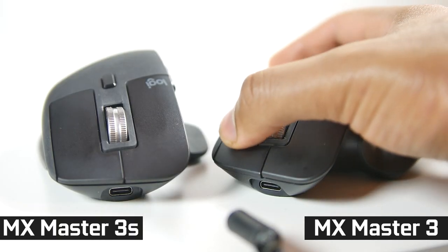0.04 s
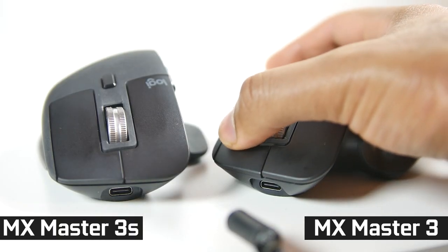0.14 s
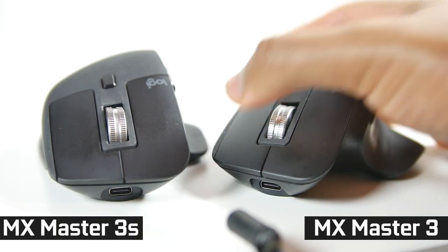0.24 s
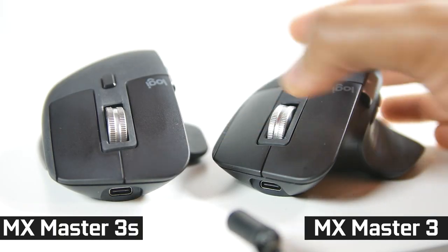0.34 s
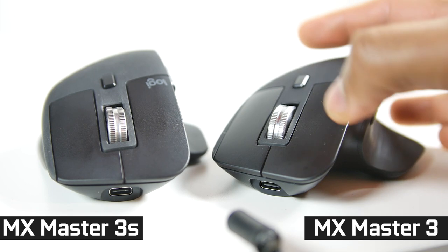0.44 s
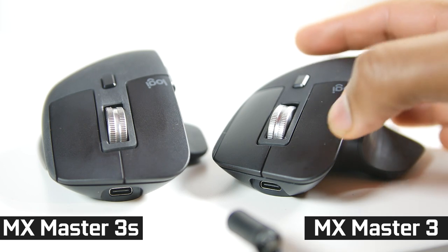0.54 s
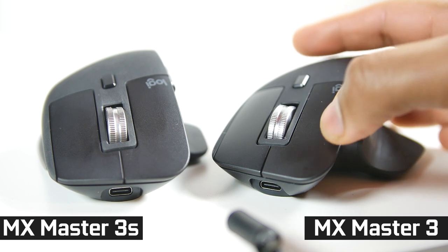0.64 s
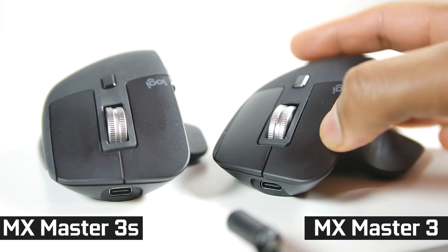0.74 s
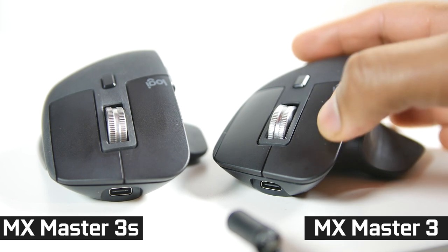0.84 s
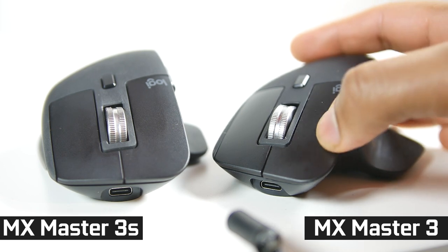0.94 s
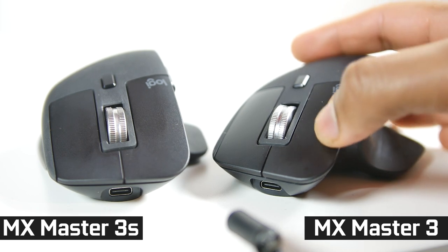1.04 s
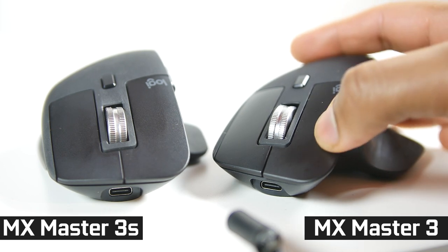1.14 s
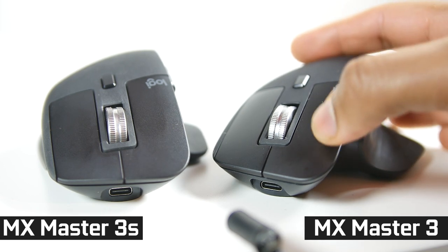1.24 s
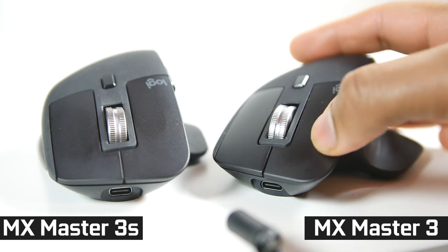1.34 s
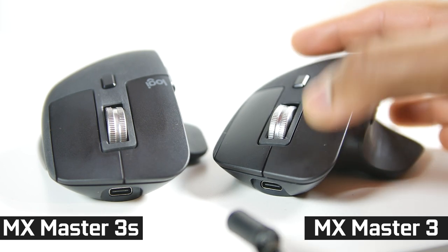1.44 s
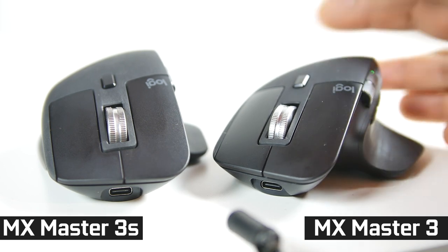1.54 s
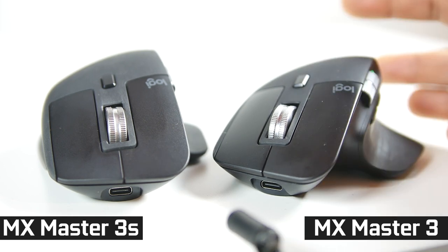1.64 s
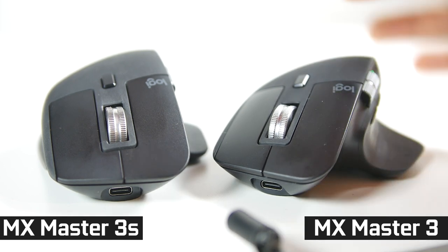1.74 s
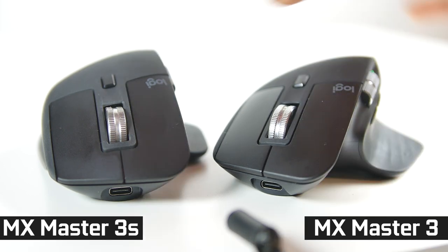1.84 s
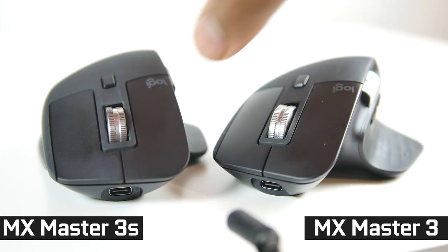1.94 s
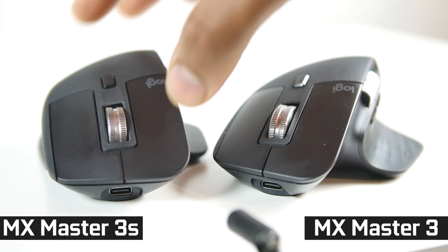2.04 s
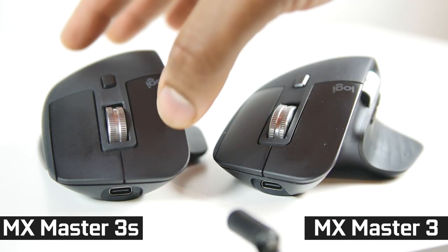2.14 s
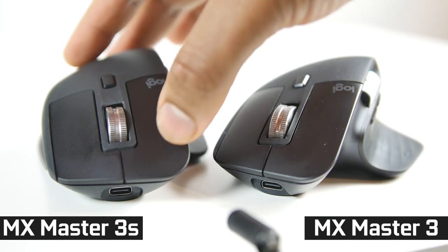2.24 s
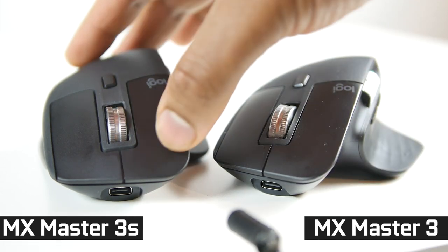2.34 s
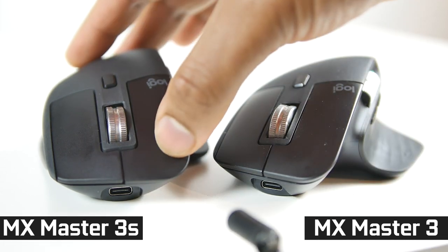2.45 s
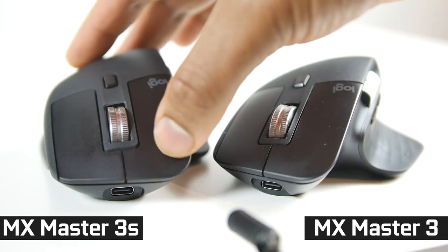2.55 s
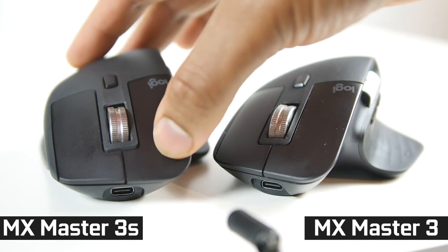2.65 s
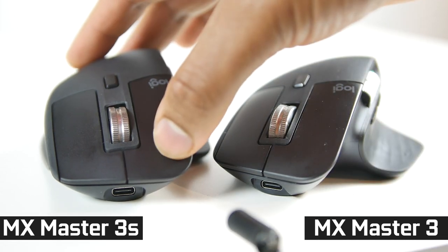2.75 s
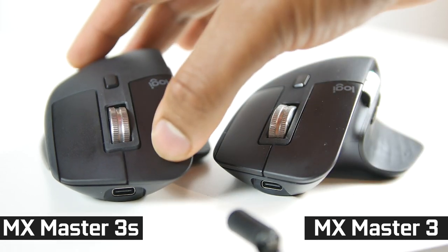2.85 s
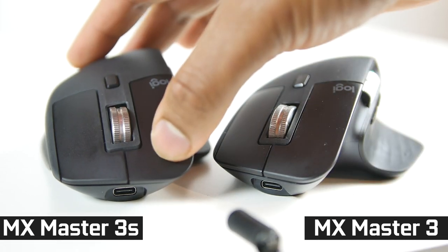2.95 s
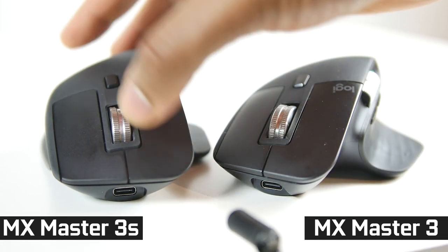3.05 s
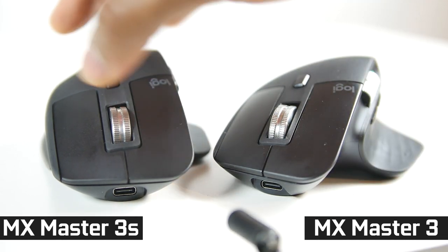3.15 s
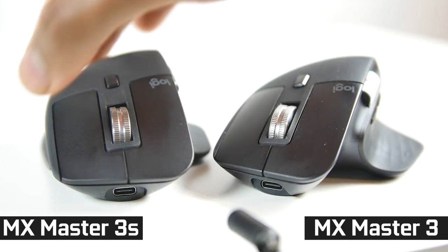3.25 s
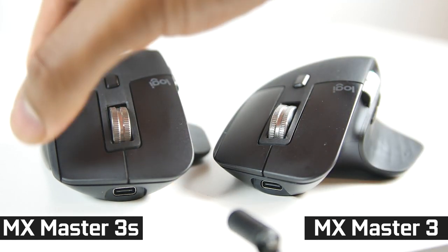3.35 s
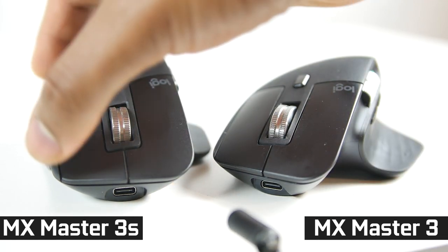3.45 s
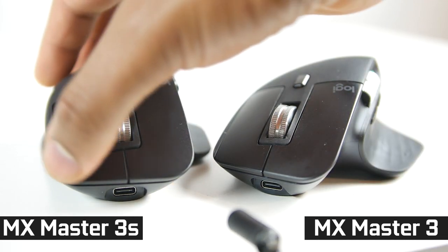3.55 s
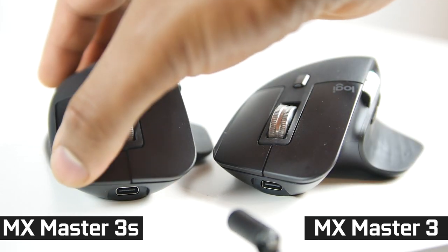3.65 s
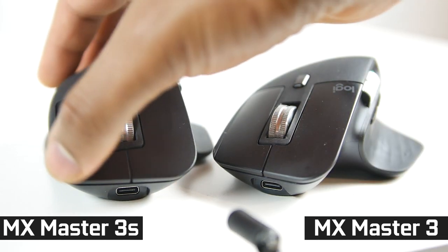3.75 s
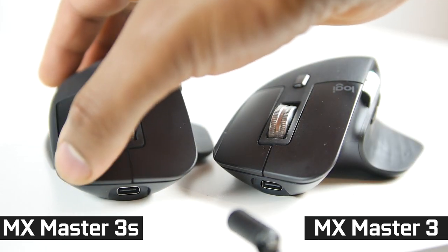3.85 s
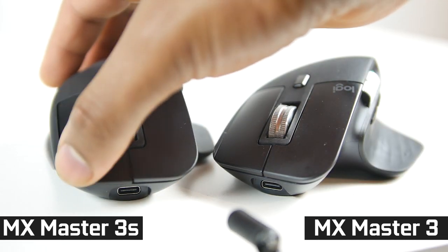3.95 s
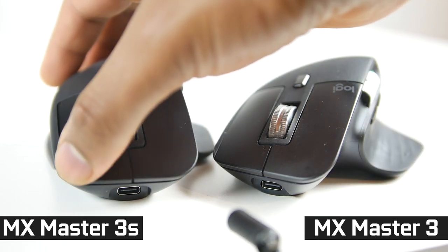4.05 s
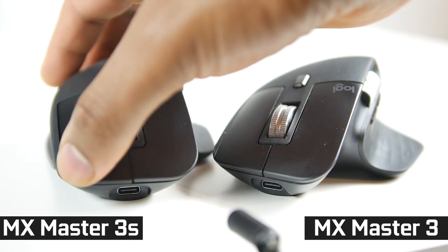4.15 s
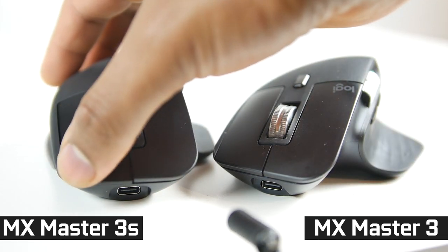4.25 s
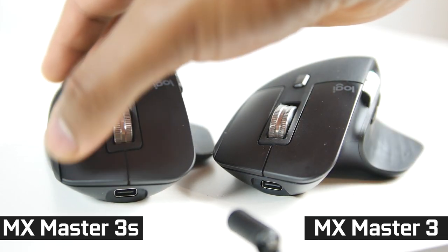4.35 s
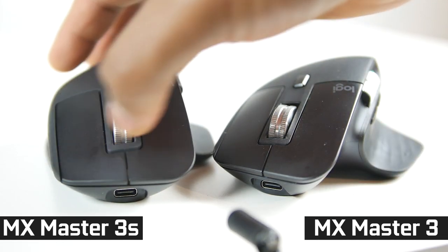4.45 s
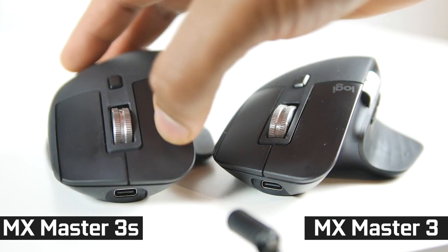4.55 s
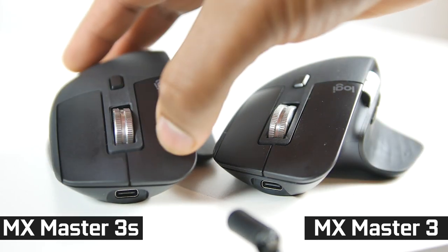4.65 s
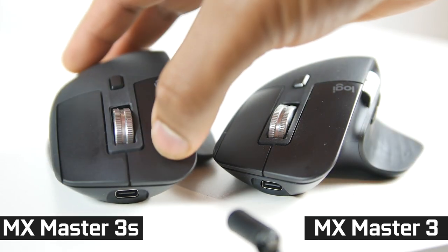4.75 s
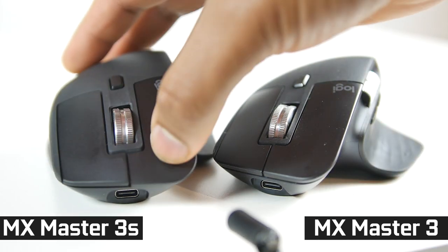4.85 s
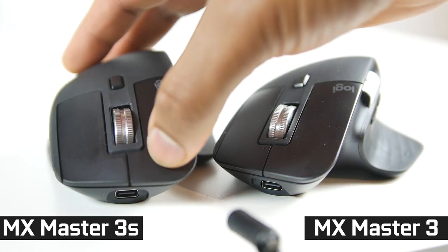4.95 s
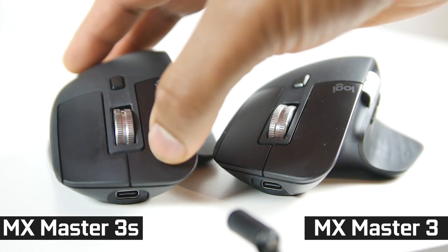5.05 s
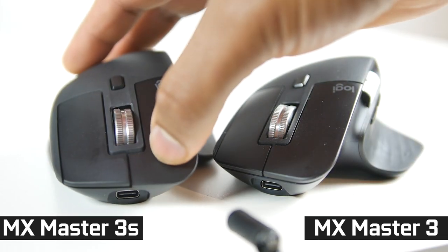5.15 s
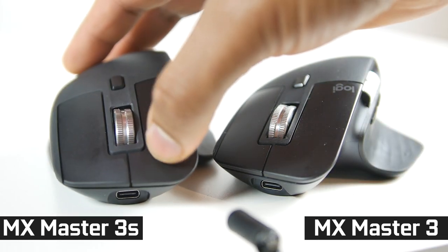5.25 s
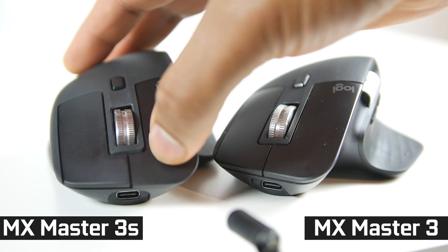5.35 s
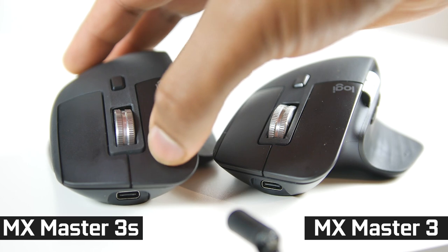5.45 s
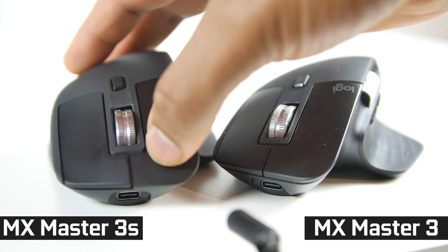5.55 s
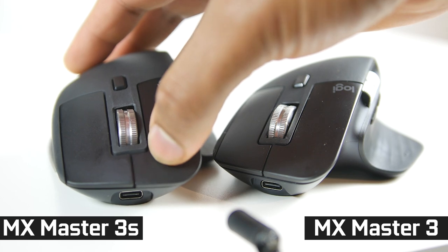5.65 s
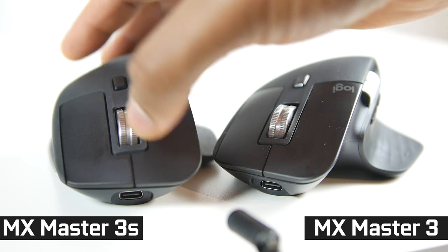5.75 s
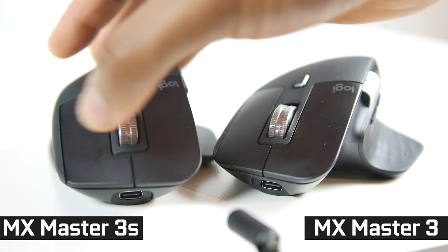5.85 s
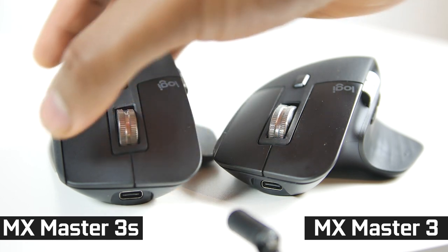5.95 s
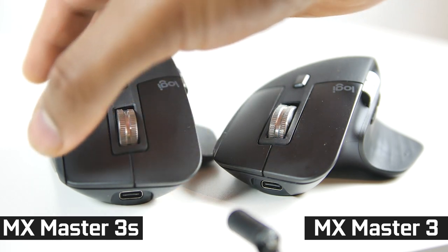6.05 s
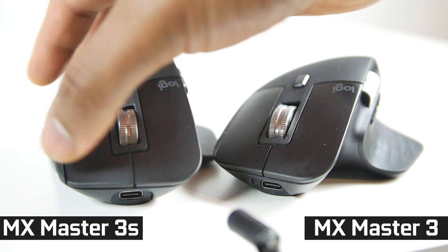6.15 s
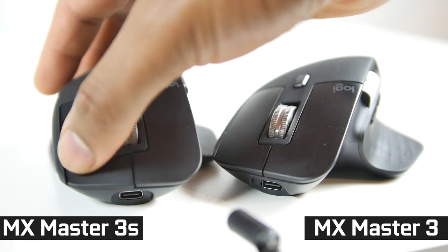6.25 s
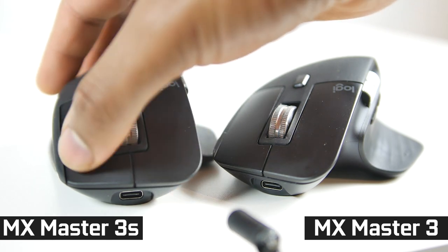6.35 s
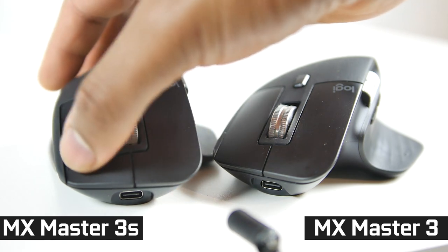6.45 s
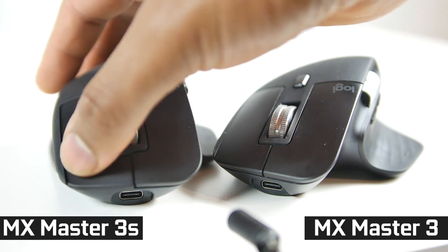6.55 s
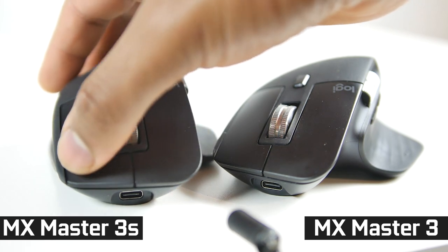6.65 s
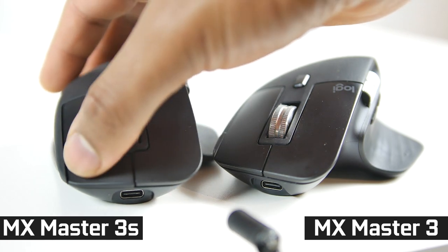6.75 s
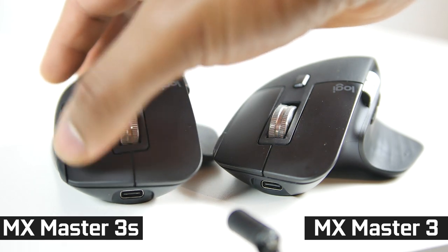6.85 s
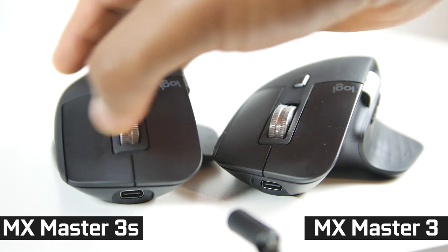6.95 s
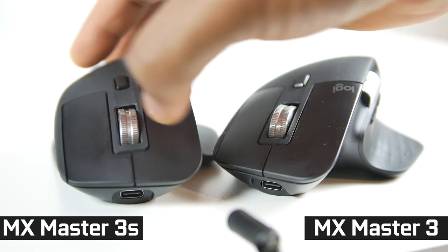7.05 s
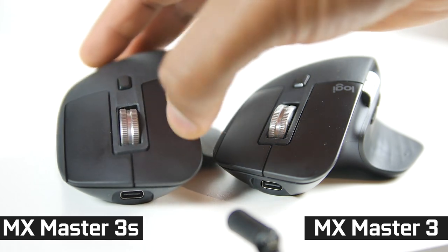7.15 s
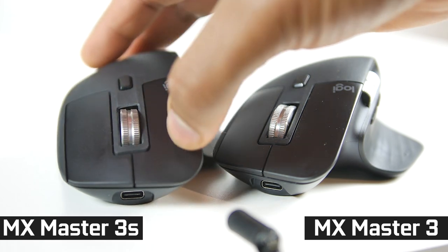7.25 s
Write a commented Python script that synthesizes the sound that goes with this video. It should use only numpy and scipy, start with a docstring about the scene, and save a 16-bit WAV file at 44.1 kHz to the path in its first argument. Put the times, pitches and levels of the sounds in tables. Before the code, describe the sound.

Crisp, springy computer mouse clicks snap in rapid succession, heard up close in a small room. The hand shifts with a soft rub and a few light bumps, then starts on a second mouse whose damped buttons make soft, dull knocks in short groups, changing slightly in tone from button to button. Fingertips tap the plastic and the desk resonates faintly, over low room noise and a barely audible thin whine.

```python
"""Two mice clicking on a desk

Close up, a finger clicks each button of two computer mice in a quick run. The first mouse has
snapping microswitches whose springs buzz; the second has damped switches that knock the shell with
only a tiny tick. Skin taps and brushes the plastic, the desk booms faintly, and a thin electronic
whine hangs in the small room."""
import sys
import numpy as np
from scipy import signal
from scipy.fft import rfft, irfft, next_fast_len
from scipy.io import wavfile
from scipy.ndimage import uniform_filter1d

SR = 44100
rng = np.random.default_rng(int(sys.argv[2]) if len(sys.argv) > 2 else 0)


def inscribe(sig):
    """Save sig as 16-bit PCM at rate SR to the path in sys.argv[1].

    A 1-D sig is mono; a 2-D sig holds one channel per row.
    Samples are clipped to [-1, 1] before scaling.
    """
    pcm = np.round(np.clip(np.atleast_2d(sig).T, -1, 1) * 32767)
    wavfile.write(sys.argv[1], SR, pcm.astype(np.int16))


N = 321489
AGE = np.arange(8192) / SR  # seconds since a hit

# Microswitch snaps, press and release in turn. Each row: start in seconds, snap level in dB, chatter
# span in seconds (the snap holds for part of it), buzz level in dB, delay to the end stop in seconds,
# and the stop's knock and clack levels in dB. Each layer adds its own trims to the cue levels.
SNAPS = [(0.0927, -15, 0.0012, -42, 0.018, -44.5, -57), (.2040, -17, 0.0046, -55, 0.0091, -30.5, -43),
         (0.7308, -13.5, 0.0016, -47, 0.012, -38.5, -51.5), (0.8258, -14, 0.0025, -34, 0.012, -37.5, -45),
         (0.9466, -17, 0.003, -49, 0.015, -35, -48.5), (1.0618, -14, 0.0027, -34, 0.0087, -31.5, -38.5),
         (1.1617, -14.5, 0.0017, -48.5, 0.011, -36.5, -46), (1.253, -14.5, 0.003, -28, 0.0085, -31.5, -40),
         (1.3505, -12.5, 0.00099, -50.5, .0066, -30, -30.5),
         (1.4472, -13.5, 0.0045, -47.5, .0052, -29, -50.5)]
# A damped switch is pressed. Each row: start in seconds, level in dB.
PRESSES = [(2.4763, -29.5), (2.6561, -28.5), (2.8789, -27.5), (3.6343, -31), (3.9351, -30.5),
           (4.2025, -28.5), (4.8641, -29), (5.1576, -28), (5.3863, -28.5), (5.5802, -25), (6.2538, -27.5),
           (6.518, -28.5), (6.7532, -28.5)]
# A damped switch is let go. Each row: start in seconds, level in dB, tick level in dB.
RELEASES = [(2.5906, -32, -53), (2.7932, -34, -53), (3.0068, -33, -44), (3.7532, -33, -48.5),
            (4.0911, -35.5, -99), (4.3185, -31.5, -67), (4.993, -33, -50.5), (5.2713, -32, -47),
            (5.508, -31.5, -61), (5.707, -33, -48.5), (6.355, -34.5, -69), (6.6443, -29.5, -49.5),
            (6.832, -32.5, -44.5)]
# A deep press hits the end stop. Each row: start in seconds, clack level in dB.
STOPS = [(2.5088, -33.5), (2.8985, -33), (4.2234, -43.5), (4.9004, -40), (5.1847, -39), (5.4216, -44.5),
         (5.5935, -30.5)]
# The fingertip lands on a button. Each row: start in seconds, level in dB, brightness in dB.
TAPS = [(.1881, -49, -3), (.2, -47, 13.5), (.4342, -45, -5), (1.3455, -41.5, 6.5), (1.6123, -50.5, 9),
        (2.2912, -54.5, -2), (2.4519, -46, 0.5), (3.3435, -58, 0), (3.6053, -37, 1), (3.862, -38, -2.5),
        (4.0492, -49, -14.5), (4.1653, -43.5, -11), (4.536, -56.5, -1.5), (4.8138, -54, 2.5),
        (5.1431, -51, -3), (5.3544, -56.5, 1.5), (5.5682, -54, 5.5), (6.033, -59.5, -3),
        (6.2433, -43.5, 6.5), (6.4946, -43, -3.5), (6.6048, -46, -7.5), (6.7323, -44.5, -1.5),
        (7.101, -59.5, 1)]
# The mouse rocks as the hand shifts or lets go. Each row: start in seconds, level in dB.
BUMPS = [(0.433, -53.5), (1.556, -51.5), (1.611, -51), (1.63, -54), (1.684, -58.5)]
# Skin slides over plastic. Each row: start and length in seconds, level in dB, rustle over hiss in dB.
SLIDES = [(0, 0.043, -49, -5.5), (0.303, 0.27, -49.5, -12), (1.714, 0.061, -55.5, -11.5),
          (2.992, 0.037, -60, 6), (3.339, 0.043, -63, -2.5), (4.305, 0.12, -63, 5.5),
          (4.598, 0.089, -70.5, 3.5), (4.925, 0.047, -57, 5.5), (7.132, 0.11, -64, 7)]
# The hand takes hold or shifts its weight. Each row: centre of the swell in seconds, level in dB.
GRIPS = [(.02, -55), (0.349, -59.5), (1.64, -50), (2.29, -55.5), (3.36, -57.5), (4.57, -62.5), (6.04, -70),
         (7.15, -62.5)]

# Resonances. Each row: frequency in Hz, bandwidth in Hz, level in dB.
# The snapping springs, alike but for their lowest mode:
SPRING = [(6230, 680, 0.5), (8000, 597, 0), (9650, 674, -1), (11750, 1600, 1.5), (13350, 200, 0),
          (14000, 820, -6), (15300, 730, 1)]
SPRING_LEFT = [(5215, 1015, -1.5)] + SPRING
SPRING_RIGHT = [(4275, 480, 0.82)] + SPRING
# The damped switches:
TICK_LEFT = [(3450, 1450, -6.5), (4750, 1180, 4.5), (5850, 3100, -1), (8270, 2700, -2), (10920, 1200, 2.5),
             (13200, 1300, -4), (15100, 860, -1)]
TICK_RIGHT = [(4040, 320, 4), (5630, 270, 2), (7500, 5500, -5), (11340, 420, 5.5), (13200, 2500, 1),
              (15700, 510, -20)]
# The thin plastic covers of the snapping mouse and of the damped mouse's left and right buttons:
SHARP_COVER = [(1398, 380, -2), (1750, 150, -15.5), (2233, 150, 4), (2336, 79, 3.5), (2420, 93, -6.5),
               (3630, 220, -4)]
QUIET_COVER = [(2000, 53, -34), (2224, 73, 5), (2550, 110, -7), (2750, 60, -2.5), (3630, 180, -8),
               (3503, 120, -16), (4600, 280, -36)]
RIGHT_COVER = [(1362, 67, 6.5), (1935, 53, -0.5), (2537, 100, 2.5), (3070, 200, -31), (4060, 290, -19)]
# The hollow body of each button:
SHARP_LEFT = [(536.6, 57, -5.5), (669.6, 41, 6.5), (781.3, 42, 2.5), (975, 66, -3), (1272, 67, -12.5),
              (1450, 150, -13)]
SHARP_RIGHT = [(573, 140, -5.5), (835, 215, 1.5), (989, 59, 2.5), (1413, 150, -19.5), (1540, 90, -2)]
QUIET_LEFT = [(621, 92.6, -3), (679.5, 64, 3.5), (913.5, 83.4, 8), (918, 72.2, 7), (1210, 80, -19.5),
              (1530, 40, -10)]
QUIET_RIGHT = [(503, 39, -11.5), (591.4, 118, -0.5), (801, 49, 3.5), (916, 90, 3), (798, 470, -7),
               (1141, 27, -7.5)]
# Plastic grating on plastic, and the desk top:
GRIT = [(1350, 760, -1.5), (2500, 680, 2), (4537, 1400, -8.5)]
DESK = [(86.1, 7.7, -1), (148.1, 6.5, -11), (215, 16, -13), (264.1, 53, -28.5)]
# Low room resonances that ring faintly after each click and bump:
LOW_RING = [(151.3, 19, -1.5), (209, 18, -6), (265.5, 25, 0.5), (346, 10, 1.5), (428, 30, -7)]
# The button under the finger. Each row: start in seconds, body modes, switch modes, cover modes.
BUTTONS = [(0, SHARP_RIGHT, SPRING_RIGHT, SHARP_COVER), (.55, SHARP_LEFT, SPRING_LEFT, SHARP_COVER),
           (2, QUIET_LEFT, TICK_LEFT, QUIET_COVER), (3.3, QUIET_RIGHT, TICK_RIGHT, RIGHT_COVER),
           (4.5, QUIET_LEFT, TICK_LEFT, QUIET_COVER), (6, QUIET_RIGHT, TICK_RIGHT, RIGHT_COVER),
           (7, QUIET_LEFT, TICK_LEFT, QUIET_COVER)]

# Partials of the whine. Each row: frequency in Hz, level in dB.
WHINE = [(1484, -71), (2968, -75), (4452, -85), (7420, -83), (8904, -93.5), (11872, -96.5)]
# When the whine sounds. Each row: start, end and fade-out time, all in seconds.
WHINE_SPANS = [(0, 0.536, 0.046), (.8, 4.81, 0.43)]
# Tone curves. Each row: frequency in Hz, relative spectral level in dB.
# The hiss and the lower rustle of sliding skin:
SKIN = [(1180, -26.5), (2000, -11.5), (4820, -7), (5630, -5.5), (6360, -8), (10900, -6.5), (14400, -4.5),
        (16000, -21.5)]
RUSTLE = [(350, -12.5), (700, -1), (1200, 1.5), (1800, -13), (2300, -4.5), (3500, -8), (6000, -41)]
# Room tone, in the centre and where it differs between the ears:
AIR = [(12, -16.5), (24, 1), (33, -0.5), (45, -8.5), (62, -25.5), (120, -44), (210, -33.5), (320, -44),
       (520, -34), (1100, -36.5), (2500, -39), (7000, -40), (16000, -40.5)]
SIDE_AIR = [(25, -28), (60, -32.5), (150, -39.5), (500, -28), (2500, -25), (16000, -34.5)]
# The near reflections and the reverb tail:
REFLECTIONS = [(60, -41), (250, -22.5), (650, -38), (1200, -27), (2400, -29), (5000, -25), (14000, -25)]
ROOM_COLOUR = [(200, -5), (700, -6), (2400, -5), (6000, -1.5), (15000, -10)]
# Decay of the small room. Each row: frequency in Hz, time to fall 60 dB in seconds.
ROOM_T60 = [(150, 0.247), (700, 0.35), (2000, 0.3), (6000, 0.13), (15000, 0.26)]


def sharp_clicks(snap_trim_db=1.5, buzz_trim_db=4, shake_trim_db=-7, body_db=-34, travel_db=-47,
                 snap_t60=0.005, buzz_t60=0.07, shake_t60=0.1, clack_t60=0.03, travel_s=0.013):
    """The button rattles on its way, the spring flips, chatters and buzzes, and the stop clacks."""
    out = np.zeros(N)
    moving = np.interp(AGE, [0, travel_s, 2 * travel_s], [0, 1, 0])
    for s, snap_db, chatter_s, buzz_db, stop_s, stop_db, clack_db in SNAPS:
        shell, spring, cover = button(s)
        travel = amp(travel_db) * burst(rattle(shell, moving) + rattle(cover, moving))
        chatter = amp(-60 * np.maximum(AGE - 0.58 * chatter_s, 0) / snap_t60)  # holds, then dies at once
        snap = amp(snap_db + snap_trim_db) * burst(rattle(spring, chatter))
        buzz = amp(buzz_db + buzz_trim_db) * dying_rattle(spring, buzz_t60)
        body = amp(body_db) * (knock(s) + amp(-1) * ring(cover, detune=0.01, scatter_db=8.5))
        shake = amp(stop_db + shake_trim_db) * dying_rattle(shell, shake_t60)
        clack = amp(clack_db) * dying_rattle(cover, clack_t60)
        add(out, s - travel_s, travel)
        add(out, s, in_room(snap + buzz + body + shake, wet_db=-22))
        add(out, s + stop_s, in_room(amp(stop_db) * knock(s) + clack, wet_db=-25.5))
    return out


def presses(knock_db=1, clack_db=-11, tick_db=-12, usual_press_db=-28):
    """The damped switch gives way; the harder the press, the brighter it sounds."""
    hits = []
    for s, db in PRESSES:
        edge_db = db + (db - usual_press_db)
        hits.append((s, db + knock_db, edge_db + clack_db, edge_db + tick_db))
    return soft_contacts(hits, tick_t60=0.016, wet_db=-20)


def releases(knock_db=1, clack_db=-11, tick_db=1.5, max_rebound_s=0.016, rebound_db=-12):
    """The button springs back with a duller knock and rebounds once; a crisp release clacks more."""
    hits, rebounds = [], []
    for s, db, edge_db in RELEASES:
        crisp_db = 0.35 * (edge_db + 50)  # the clack follows the tick around its usual -50 dB
        levels = np.array([db + knock_db, db + clack_db + crisp_db, edge_db + tick_db])
        hits.append((s, *levels))
        rebounds.append((s + max_rebound_s * rng.uniform(0.85, 1.0), *(levels + rebound_db)))
    return soft_contacts(hits + rebounds, tick_t60=0.014, wet_db=-23)


def end_stops(knock_db=-12, tick_db=-9):
    """Plastic meets plastic at the bottom of a deep press: mostly the cover clacks."""
    hits = [(s, db + knock_db, db, db + tick_db) for s, db in STOPS]
    return soft_contacts(hits, tick_t60=0.0065, wet_db=-24)


def fingertip(clack_db=-2, tick_db=-5, lead_s=0.02, landing_db=-45, dull_db=-6, bump_db=2):
    """Light taps: the finger lands on a button, or jogs the shell as the mouse rocks."""
    landings = [(s - lead_s, landing_db, dull_db) for s, *_ in SNAPS[::2]]  # ahead of each sharp press
    jogs = [(s, db + bump_db, dull_db) for s, db in BUMPS]
    hits = [(s, db, db + bright + clack_db, db + bright + tick_db)
            for s, db, bright in TAPS + landings + jogs]
    return soft_contacts(hits, tick_t60=0.026, wet_db=-14)


def soft_contacts(hits, tick_t60, wet_db, right_trim_db=-3):
    """Each cushioned hit knocks the body, clacks and grates on the cover and leaves a tiny tick."""
    out = np.zeros(N)
    for s, knock_db, clack_db, tick_db in hits:
        _, switch, cover = button(s)
        body = amp(knock_db) * knock(s)
        grit = dying_rattle(GRIT, t60=0.023)
        clack = amp(-2) * (ring(cover, detune=0.02, scatter_db=4) + grit)
        clack *= amp(clack_db + right_trim_db * (cover == RIGHT_COVER))
        tick = amp(tick_db) * dying_rattle(switch, tick_t60)
        add(out, s, in_room(body + clack + tick, wet_db))
    return out


def knock(s, low_ring_db=-30):
    """The hollow ring of a button, detuned by the finger's grip, over a faint low ring of the room."""
    shell, _, _ = button(s)
    hollow = ring(shell, detune=0.017, scatter_db=0.57)
    return hollow + amp(low_ring_db) * ring(LOW_RING, detune=0.0031, scatter_db=4)


def ring(modes, detune, scatter_db):
    """One blow rings a set of modes; their pitch and balance vary from hit to hit."""
    shift = np.exp(detune * rng.standard_normal())
    held = [(hz * shift, width, db + scatter_db * rng.standard_normal()) for hz, width, db in modes]
    f = np.fft.rfftfreq(len(AGE), 1 / SR)
    soft = 1 / (1 + 1j * f / (1.98 * modes[-1][0])) ** 2  # a slow contact excites little treble
    return burst(irfft(resonances(held, f) * soft))


def rattle(modes, envelope):
    """Countless tiny impacts under an envelope ring a set of modes."""
    f = np.fft.rfftfreq(len(AGE), 1 / SR)
    return irfft(rfft(envelope * rng.standard_normal(len(AGE))) * resonances(modes, f))


def dying_rattle(modes, t60):
    """A rattle whose impacts fall by 60 dB in t60 seconds."""
    return burst(rattle(modes, amp(-60 * AGE / t60)))


def skin_rubs(grain_db=1.5, body_db=-3, lift_lead_s=0.0075, lift_s=0.033, lift_db=-62, lift_low_db=6):
    """Skin ridges catch and slip in slides and damped releases: a grainy hiss that stirs the shell."""
    out = np.zeros(N)
    lifts = [(s - lift_lead_s, lift_s, lift_db, lift_low_db) for s, *_ in RELEASES]
    for s, length, db, low_db in SLIDES + lifts:
        count = int(length * SR)
        grain = amp(grain_db * unit(uniform_filter1d(rng.standard_normal(count), size=60)))
        shell, _, _ = button(s)
        f = np.fft.rfftfreq(count, 1 / SR)
        stirred = unit(irfft(rfft(rng.standard_normal(count)) * resonances(shell, f), count))
        hiss = noise(SKIN, count) + amp(low_db) * (noise(RUSTLE, count) + amp(body_db) * stirred)
        stroke = np.sin(np.pi * np.linspace(0, 1, count) ** 0.64) ** 2  # quick swell, slower fade
        add(out, s, in_room(amp(db) * stroke * unit(grain) * hiss, wet_db=-11.5))
    return out


def desk(stroke_db=-54, scatter_db=1.5, right_db=3, grip_db=-1, grip_s=0.04, rest_db=-72,
         soft_hz=150, push_s=0.0026, thud_db=-2):
    """The desk booms at every button stroke and swells under the grip; bumps thud in the room."""
    t, f = np.arange(N) / SR, np.fft.rfftfreq(N, 1 / SR)
    top = resonances(DESK, f, sign=0.77)
    swells = sum(amp(db + grip_db) * np.exp(-((t - s) / grip_s) ** 2) for s, db in GRIPS)
    rumble = unit(irfft(rfft(rng.standard_normal(N)) * top / (1 + (f / soft_hz) ** 2), N))
    out = (amp(rest_db) + swells) * rumble
    attack = 1 - np.exp(-t / push_s)
    boom = burst((irfft(top, N) * attack)[:SR // 2])
    for s, *_ in SNAPS + PRESSES + RELEASES:
        _, _, cover = button(s)
        boom_db = stroke_db + right_db * (cover == RIGHT_COVER) + scatter_db * rng.standard_normal()
        add(out, s, amp(boom_db) * boom)
    damped = [(hz, 2.1 * width, db) for hz, width, db in LOW_RING]  # wider modes die sooner
    for s, db in BUMPS:
        add(out, s, amp(db + thud_db) * dying_rattle(damped, t60=0.042))
    return out


def whine(trim_db=-2, rise_s=0.062):
    """A thin electronic tone that comes on, holds and fades."""
    t = np.arange(N) / SR
    tone = sum(np.sqrt(2) * amp(db) * np.sin(2 * np.pi * (hz * t + rng.random())) for hz, db in WHINE)
    gate = sum(np.clip(np.minimum((t - start) / rise_s, (end - t) / fade), 0, 1)
               for start, end, fade in WHINE_SPANS)
    return amp(trim_db) * gate * tone


def in_room(sound, wet_db, build_s=0.0024):
    """The sound followed by the diffuse tail of the small room."""
    hz, t, spectrum = signal.stft(rng.standard_normal(SR // 3), SR, nperseg=256)
    decay = amp(along(ROOM_COLOUR, hz)[:, None] - 60 * t / along(ROOM_T60, hz)[:, None])
    _, tail = signal.istft(spectrum * decay, SR, nperseg=256)
    tail *= 1 - np.exp(-np.arange(len(tail)) / SR / build_s)
    tail *= amp(wet_db) / np.linalg.norm(tail)
    tail[0] = 1  # the direct sound
    return signal.fftconvolve(sound, tail)


def near_reflections(sound, t60=0.056):
    """A short, faint scatter off nearby surfaces that gives a trace of width."""
    scatter = noise(REFLECTIONS, len(AGE)) * amp(-60 * AGE / t60)
    colour = amp(along(REFLECTIONS, np.fft.rfftfreq(len(AGE), 1 / SR)))
    scatter *= np.linalg.norm(colour) / np.linalg.norm(rfft(scatter))
    return signal.fftconvolve(sound, scatter)[:N]


def button(s):
    """Body, switch and cover modes of the button under the finger at s seconds."""
    return [parts for start, *parts in BUTTONS if start <= s][-1]


def resonances(modes, f, sign=-1):
    """Response of modes; alternating signs fill the valleys between them, equal signs leave notches."""
    return sum(sign ** k * amp(db) * 1j * f * width / (hz * hz - f * f + 1j * f * width)
               for k, (hz, width, db) in enumerate(modes))


def noise(colour, count):
    """Noise of rms 1 shaped by a tone curve."""
    gain = amp(along(colour, np.fft.rfftfreq(count, 1 / SR)))
    return unit(irfft(rfft(rng.standard_normal(count)) * gain, count))


def along(curve, hz):
    """A curve read on a log frequency axis."""
    freqs, values = np.transpose(curve)
    return np.interp(np.log(hz + 1), np.log(freqs), values)


def amp(db):
    """Decibels to gain."""
    return 10 ** (np.asarray(db) / 20)


def unit(x):
    """Scaled to rms 1."""
    return x / np.sqrt(np.mean(x ** 2) + 1e-20)


def burst(x):
    """Scaled so that the loudest two milliseconds have rms 1."""
    return x / np.sqrt(uniform_filter1d(x ** 2, size=88).max() + 1e-20)


def add(track, s, sound):
    """Mix a sound into the track at s seconds."""
    start = int(round(s * SR))
    part = sound[max(-start, 0):N - start]
    track[max(start, 0):][:len(part)] += part


def scene(air_db=-58, side_air_db=-80):
    """Everything sits in the centre over the room's rumble and faint hiss, with a trace of width."""
    clicks = sharp_clicks() + presses() + releases() + end_stops()
    sounds = clicks + fingertip() + skin_rubs() + desk() + whine()
    reflections = near_reflections(sounds)
    mid = sounds + amp(air_db) * noise(AIR, N)
    side = reflections + amp(side_air_db) * noise(SIDE_AIR, N)
    return np.array([mid + side, mid - side]) * amp([[0.08], [-0.08]])  # a hair to the left


def record(dry, ceiling=0.55, top_hz=16200):
    """Soft clipping rounds the highest peaks, and a steep low-pass cuts the very top."""
    rounded = dry / (1 + np.abs(dry / ceiling) ** 6) ** (1 / 6)
    count = next_fast_len(N + SR // 2)
    hz = np.fft.rfftfreq(count, 1 / SR)
    return irfft(rfft(rounded, count) / (1 + (hz / top_hz) ** 100), count)[:, :N]


dry = scene()
out = record(dry)
inscribe(out)
```